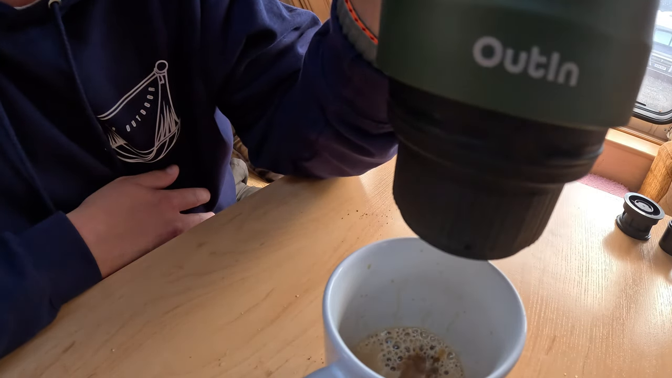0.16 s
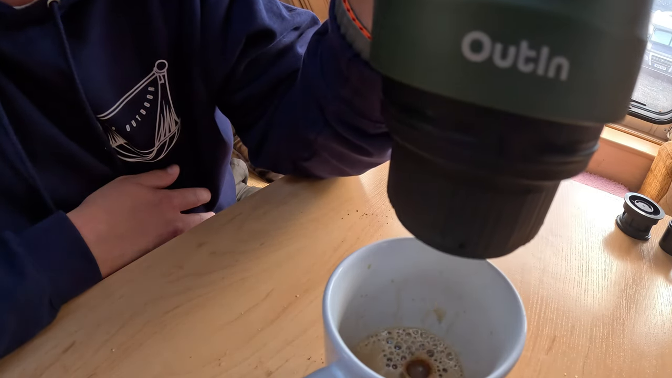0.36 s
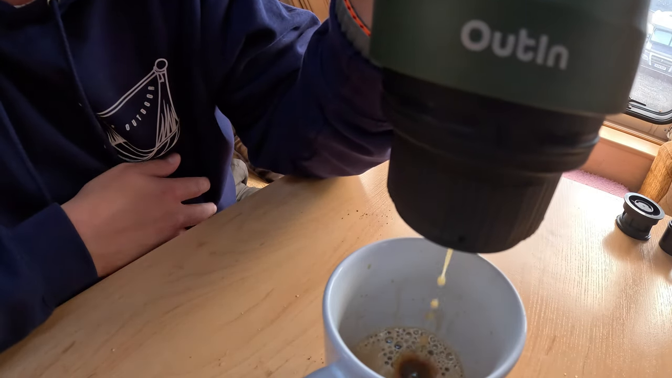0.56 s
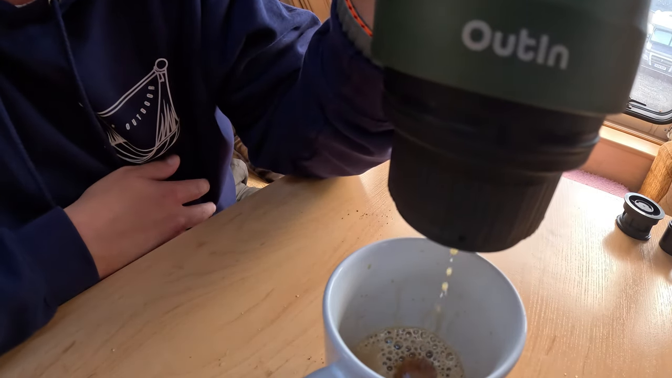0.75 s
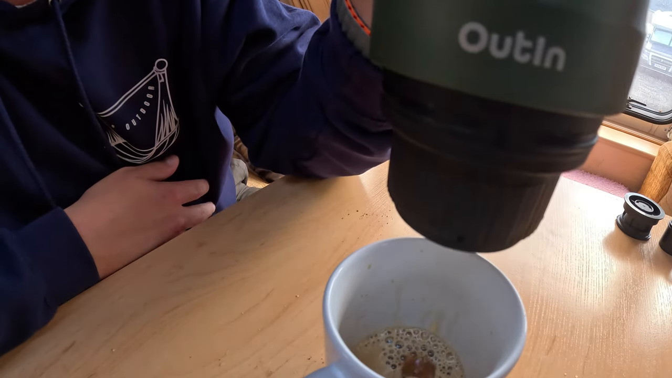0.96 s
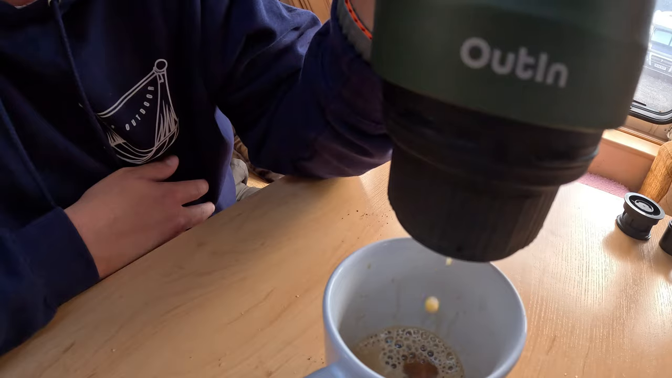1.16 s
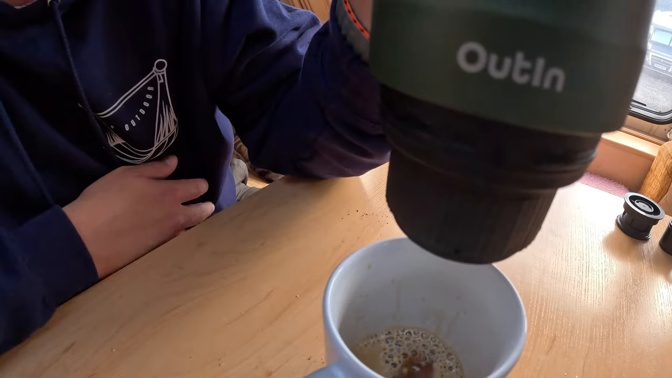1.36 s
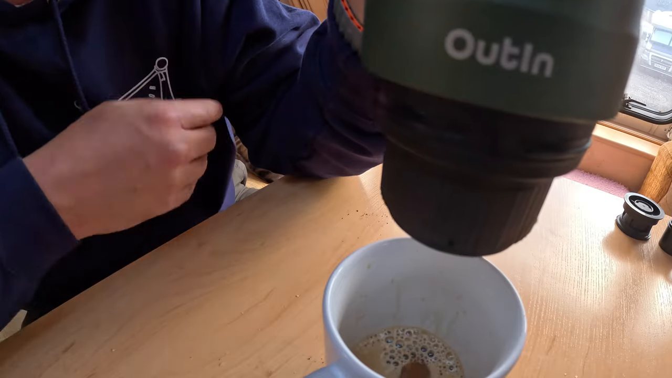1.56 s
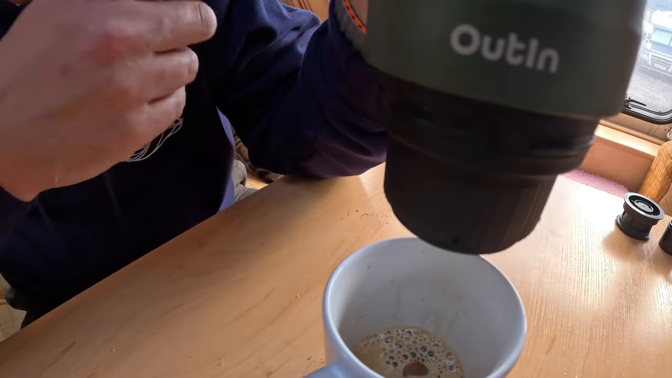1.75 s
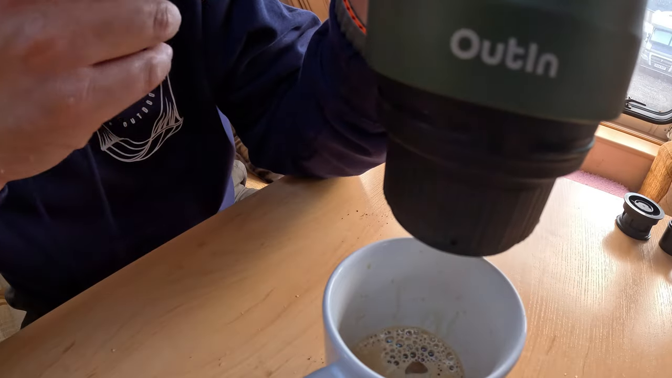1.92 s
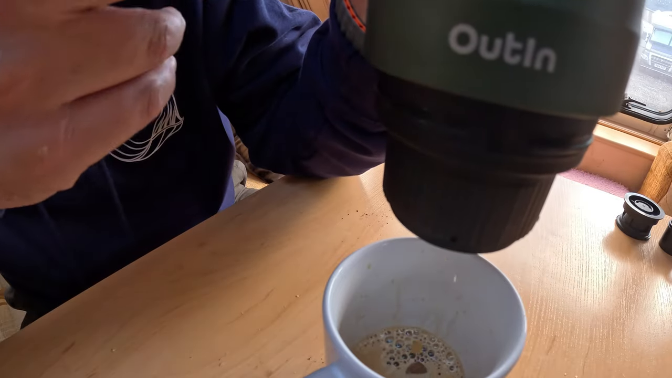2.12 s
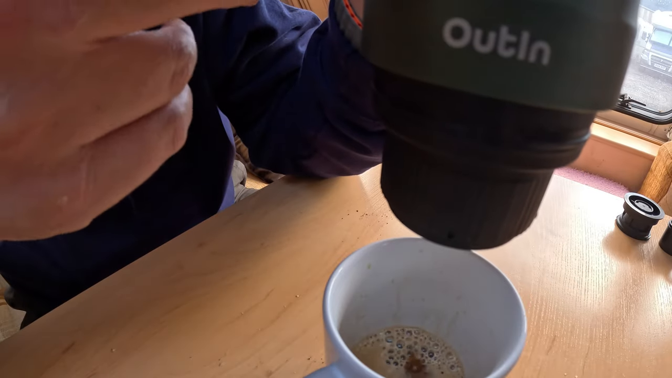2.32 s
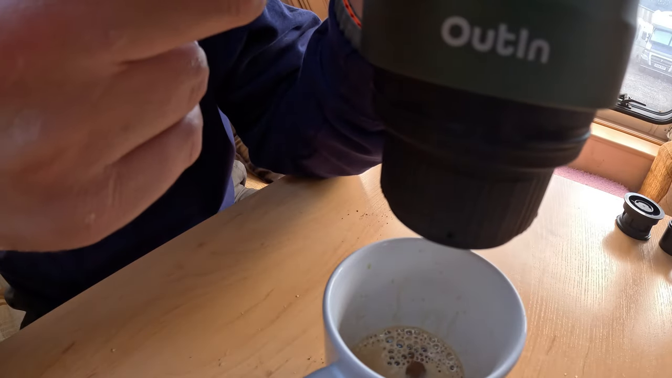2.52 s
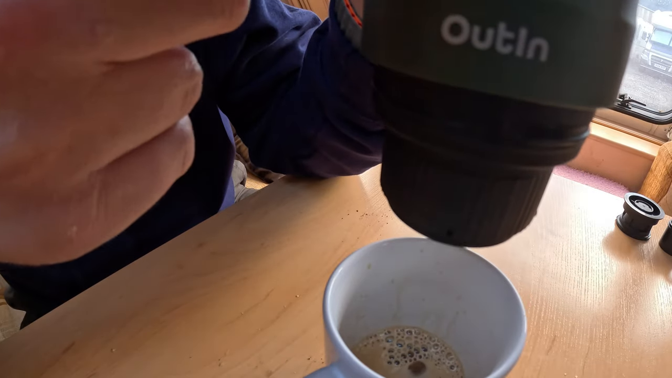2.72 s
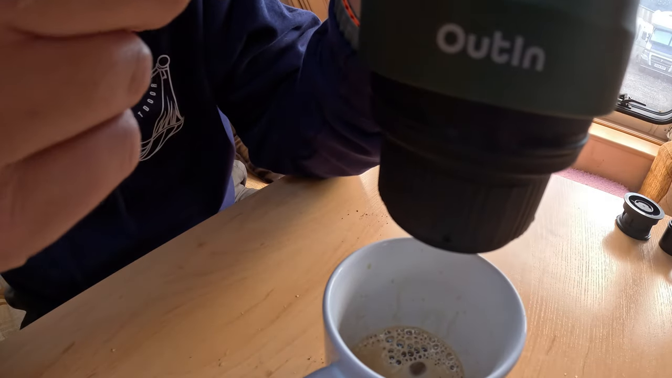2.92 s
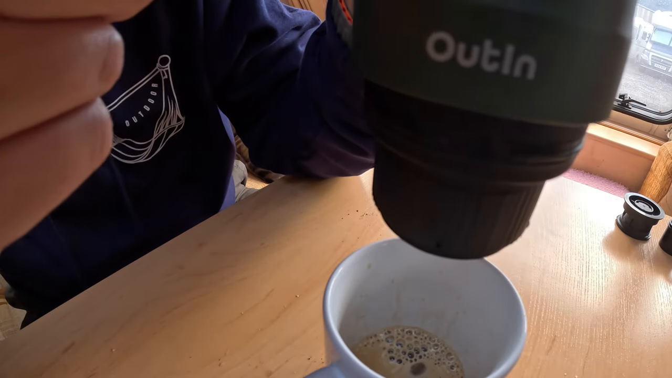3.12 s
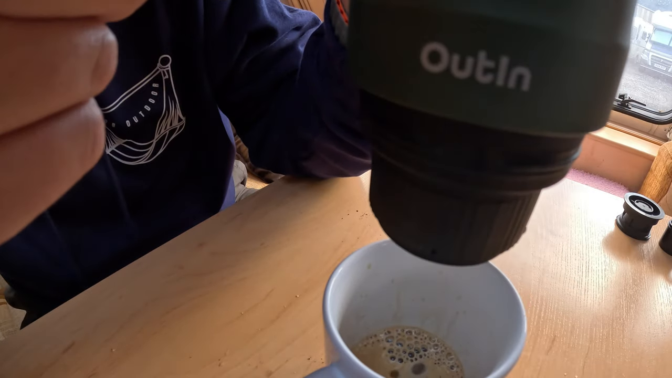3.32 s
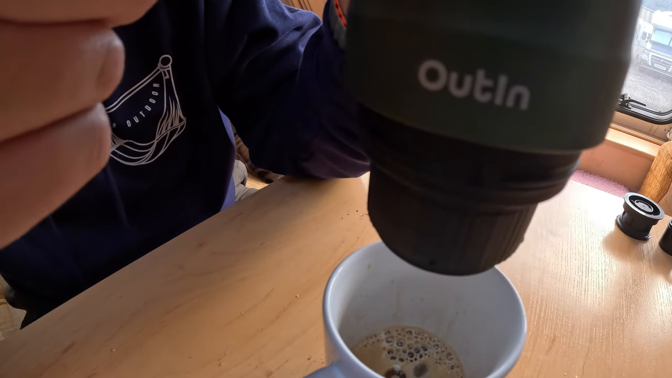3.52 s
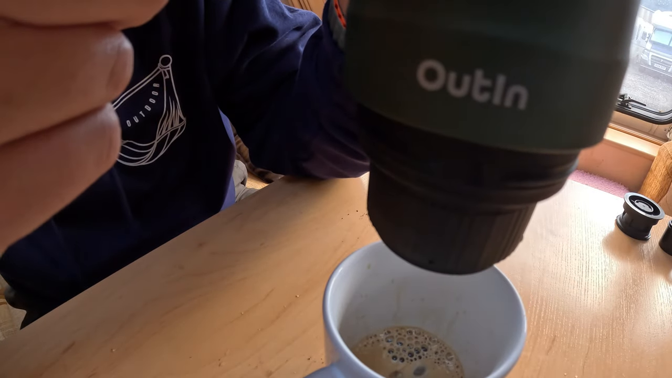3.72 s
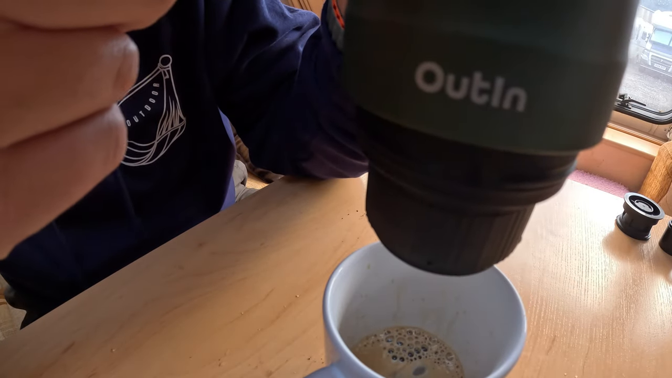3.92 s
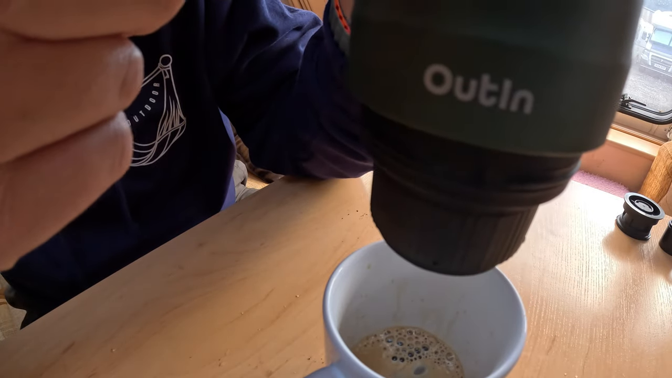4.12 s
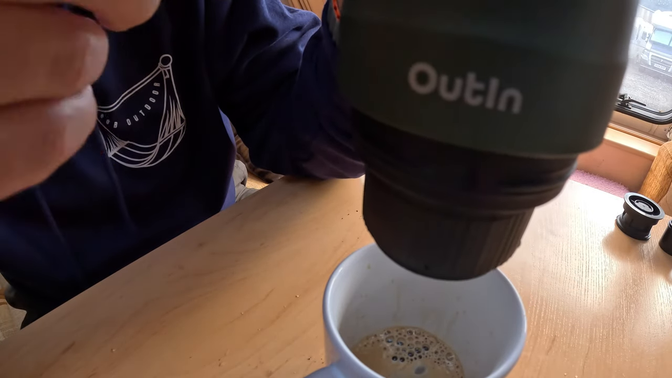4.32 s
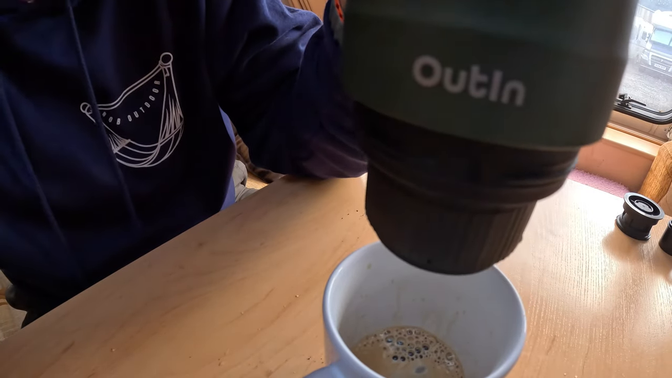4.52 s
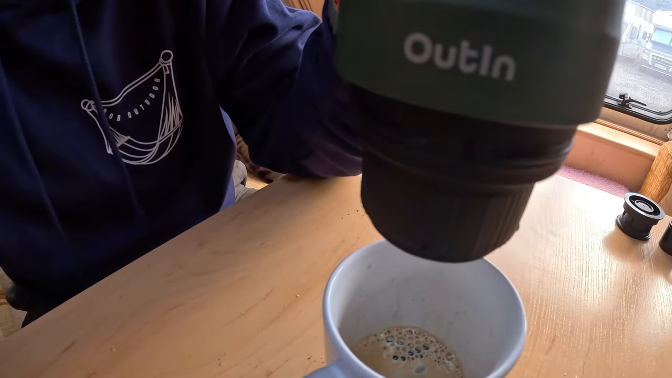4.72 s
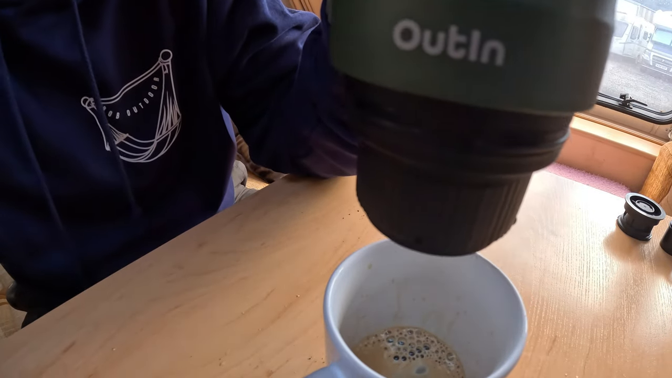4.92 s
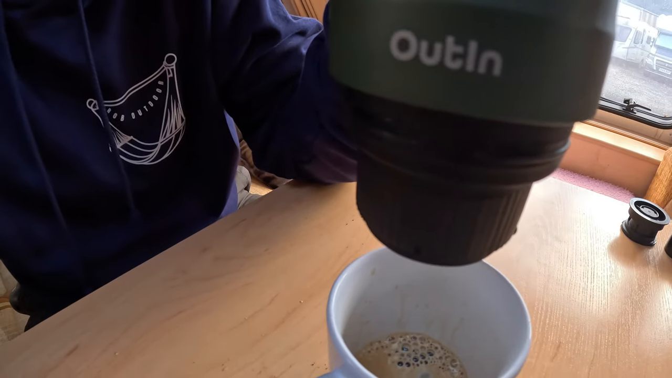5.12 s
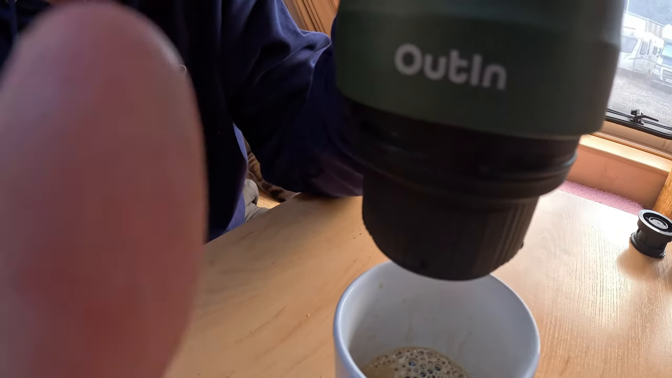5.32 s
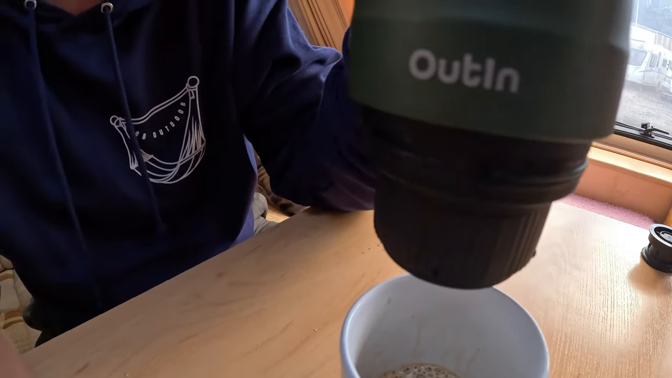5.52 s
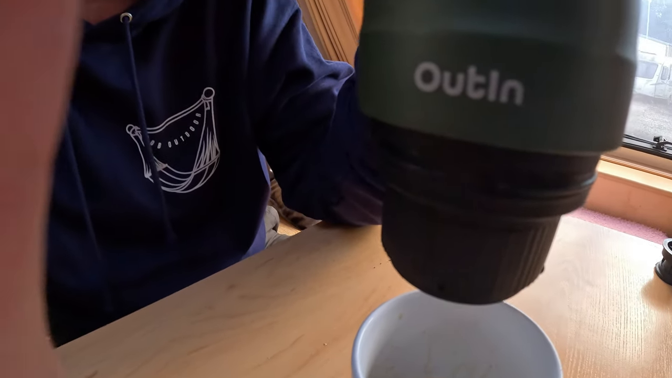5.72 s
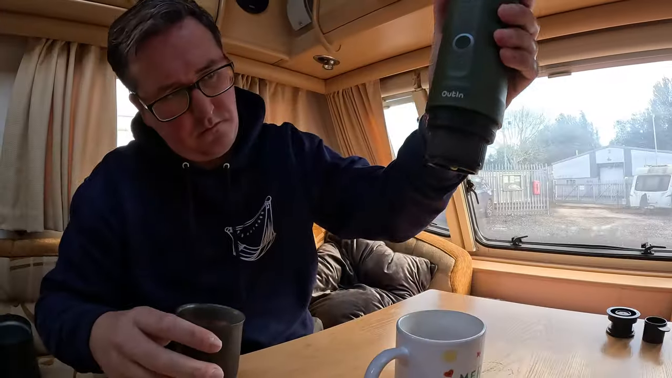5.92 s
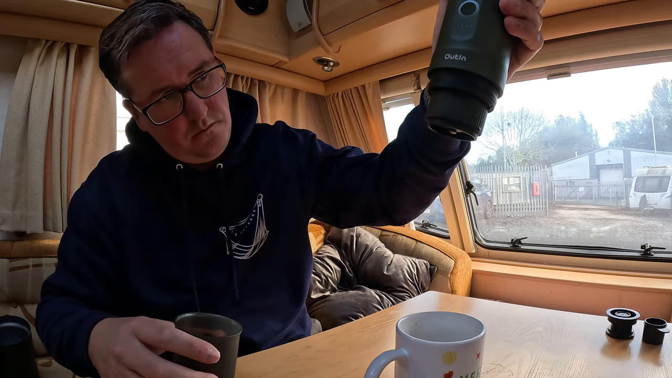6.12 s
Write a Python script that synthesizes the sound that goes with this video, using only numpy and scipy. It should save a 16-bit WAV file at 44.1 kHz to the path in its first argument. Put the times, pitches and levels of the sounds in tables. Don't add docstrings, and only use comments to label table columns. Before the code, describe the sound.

A small housed microphone close to a hand-held pump catches a steady electric buzz, fast valve clicks and hissing liquid. A brief dip and gurgle lead into a high wavering air squeal and drips in a cup. The buzz becomes steadier and airier until it suddenly winds down in a few loose clicks. The dry little cabin falls nearly silent, then fingers scuff and objects knock lightly on a table.

```python
import sys
import numpy as np
from scipy import signal
from scipy.fft import rfft, irfft
from scipy.io import wavfile
from scipy.ndimage import uniform_filter1d

SR = 44100
rng = np.random.default_rng(int(sys.argv[2]) if len(sys.argv) > 2 else 0)


def gain_from_db(level_db):
    decades = np.asarray(level_db, float) / 20
    return 10 ** decades


def to_wav(s):
    ch = np.atleast_2d(s).T
    pcm = np.round(np.clip(ch, -1, 1) * 32767)
    wavfile.write(sys.argv[1], SR, pcm.astype(np.int16))


N = 271656

# t/s, rate/(turns per s)
SPEED = [(0, 74.6), (.28, 74.3), (.39, 73.9), (.46, 71.7), (.515, 69.1), (.57, 73.2), (.6, 74.4),
         (.76, 75.2), (1.11, 75.6), (1.6, 75.6), (1.86, 75.0), (1.92, 73.8), (1.98, 75.2), (2.12, 75.4),
         (2.57, 75.4), (2.95, 75.7), (4.55, 76.0)]
# t/s, state (0 water, 1 froth, 2 air)
EMPTYING = [
    (0, -0.3),
    (.5, -1),
    (.62, 1.42),
    (1.8, 1.2),
    (2.1, 1.48),
    (3.3, 2),
    (6.2, 2),
]
# hum level/dB, valve level/dB, rattle level/dB, hiss level/dB
STATES = [(-21.5, -31, -45, -32.5), (-22.5, -34, -44, -31.5), (-21.5, -30.5, -43.5, -31.5)]
LOOSE = [.8, .8, .35]
COAST_DB_PER_S = [90, 85, 140, 35, 15]
# multiple of turn rate, level/dB
LOADED_HUM = [(1, -43), (2, -21), (3, -12), (4, -16), (5, -33), (6, -21), (7, 0), (8, -10), (9, -1),
              (10, -3), (11, -1), (12, -1), (13, -15), (14, -9), (15, -12), (16, -9), (17, -14), (18, -7),
              (19, -6), (20, -6), (21, -15), (22, -14), (23, -13), (24, -14), (25, -19), (26, -17)]
# multiple of turn rate, level/dB
FROTH_HUM = [(1, -41), (2, -25), (3, -11), (4, -15), (5, -26), (6, -24), (7, -3), (8, -4), (9, -4), (10, 0),
             (11, -3), (12, -1), (13, -15), (14, -14), (15, -8), (16, -10), (17, -5), (18, -13), (19, -11),
             (20, -15), (21, -9), (22, -13), (23, -19), (24, -16), (25, -20), (26, -18)]
# multiple of turn rate, level/dB
FREE_HUM = [(1, -47), (2, -30), (3, -15), (4, -21), (5, -28), (6, -20), (7, -6), (8, -5), (9, -11), (10, 0),
            (11, -10), (12, -5), (13, -18), (14, -23), (15, -11), (16, -13), (17, -10), (18, -12),
            (19, -19), (20, -17), (21, -17), (22, -15), (23, -15), (24, -24), (25, -23), (26, -24)]
# share of turn, level/dB
CONTACTS = [(.0, 5), (0.117, -11), (0.328, -7.5), (0.5, -7.5), (0.659, -5.5), (0.837, -9.5)]
# f/Hz, width/Hz, level/dB
SHELL = [(2350, 850, -1), (2904, 376, 3)]
SHELL_PASS_HZ = [1650, 3450]
# share of turn, level/dB
GEAR = [(.27, -16), (.37, -1), (0.498, -9.5), (.66, 1.5), (0.782, 12.5), (0.924, 20)]
# f/Hz, width/Hz, level/dB
HOUSING = [(4170, 347, 3), (4920, 1300, -15), (5390, 32, -23), (5780, 330, -4.5), (7736, 230, -8.5),
           (10670, 1700, -18.5), (10950, 510, -16.5)]
# f/Hz, density/(dB per Hz)
HISS = [(40, -47.5), (100, -35.5), (220, -34), (400, -31.5), (520, -7), (800, 5), (1050, -2.5), (1700, -6),
        (3000, -2.5), (4000, -10), (5200, -13.5), (7800, -23.5), (13300, -31.5), (14300, -50)]
DRY_DB = [-1, -3.5, -6]
# t/s, peak level/dB, ring f/Hz
LAST_TURNS = [(4.574, -10.5, 845), (4.62, -19, 850), (4.639, -17, 880), (4.658, -16.5, 840),
              (4.681, -26, 770), (4.708, -25.5, 834), (4.742, -29, 780), (4.76, -32, 730)]
# t/s, level/dB, half length/s
SLUGS = [
    (0.45, -25, 0.14),
    (1.89, -25, 0.058),
]
# f/Hz, width/Hz, level/dB
CHAMBER = [(356, 65, -4.5), (835, 240, -3), (1340, 82, 2), (1600, 210, 2.5), (2020, 120, -4),
           (2930, 560, -7.5), (3920, 470, -11)]
# t/s, pitch f/Hz, level/dB
SQUEAL = [(0.749, 3860, -34), (.766, 3635, -20), (0.79, 3570, -18.5), (0.809, 3440, -30.5),
          (0.905, 3223, -23.5), (1.042, 3146, -17.5), (1.245, 3250, -23), (1.284, 3345, -24.5),
          (1.294, 3720, -18)]
OVERTONES_DB = [-8.5, -30.5, -45.5]
# t/s, peak level/dB, ring f/Hz, cup level/dB
DROPS = [(.702, -16.5, 1700, -28), (.7791, -16, 1880, -30), (.9966, -23, 1587, -30),
         (1.8994, -22, 1630, -27), (4.0695, -21, 2300, -16), (4.2385, -17, 1900, -21),
         (4.2425, -19, 2300, -25)]
CUP_HZ = [600, 1400, 3100]
# t/s, peak level/dB
SNAPS = [(0.7, -21), (0.7411, -42), (1.8894, -25), (4.0696, -15), (4.24, -37), (5.1262, -55.5),
         (5.683, -36), (5.7594, -57), (5.8057, -62), (5.8316, -53), (5.8504, -58)]
# t/s, peak level/dB, ring f/Hz, thud level/dB
SOFT_KNOCKS = [(5.614, -21, 620, -36.5), (5.634, -39, 690, -49), (5.663, -28.5, 600, -35.5),
               (5.699, -32, 620, -43), (5.831, -28, 580, -35), (5.842, -35, 466, -41)]
# t/s, peak level/dB, ring f/Hz, thud level/dB
HARD_KNOCKS = [(5.683, -21, 1200, -40), (5.8062, -26, 1050, -36.5), (5.8215, -29, 1230, -38),
               (5.8322, -26.5, 1050, -40), (5.854, -54, 1020, -46)]
# t/s, level/dB, half length/s
SCUFFS = [(5.56, -54, .09), (5.69, -48, .03), (5.755, -52, .016), (5.83, -56, .03)]
# f/Hz, density/(dB per Hz)
RUSTLE = [(350, -21), (600, -20), (725, -21), (1070, -15.5), (1540, -18.5), (2930, -17), (8500, -41.5),
          (11000, -76), (18700, -120)]
# f/Hz, density/(dB per Hz)
CABIN = [(15, -56), (25, -21), (112, -28.5), (151, -10), (179, -11), (349, -6.5), (425, -12.5), (678, -6),
         (1220, -12), (1420, -11), (1730, -18), (5370, -36), (9000, -55.5), (11700, -86.5), (19800, -120)]

OFF_S, SLOWING_PER_S2 = 4.583, 222
STALL_S, STALL_DB = 0.25, 31
WOBBLE_TURNS, SHAKEN_DB, MUFFLED_DB = .006, 2.5, -1.5
SURGE, SURGE_HZ, SURGE_WIDTH_HZ = 1.4, 870, 50
TIGHT_HZ, TIGHT_DB_PER_HZ = 3380, .07
SOFT_T60_S, SOFT_RISE_S, HARD_T60_S, HARD_RISE_S = 0.012, 0.0047, 0.0068, 0.00076
RUMBLE_DB, RUMBLE_T60_S = -4, .15
HANDLING_END_S = 5.858
CABIN_DB, BOX_DB = -50, -55


def pump():
    since_off = (np.arange(N) / SR - OFF_S).clip(0)
    speed, = in_time(SPEED)
    speed = np.maximum(speed - SLOWING_PER_S2 * since_off, 10)
    stage = in_time(EMPTYING)[0].clip(0, 2)
    hum_db, valve_db, rattle_db, hiss_db = [np.interp(stage, [0, 1, 2], db) + coasting(fade)
                                            for db, fade in zip(np.transpose(STATES), COAST_DB_PER_S)]

    labour = swells([(s + half / 3, 0, half) for s, _, half in SLUGS], edge_db=12)
    labour = labour + since_off.clip(0, .03) / .03
    turns = np.cumsum(speed) / SR + WOBBLE_TURNS * labour * drift(25)
    loose = np.interp(stage, [0, 1, 2], LOOSE) + SHAKEN_DB * labour
    valve_db = valve_db + MUFFLED_DB * labour

    stroke = gain_from_db(2.0 * np.cos(2 * np.pi * (turns - .5)) + 0.43 * np.cos(4 * np.pi * turns + 1.6))
    hiss = gain_from_db(hiss_db) * stroke * coloured(HISS, patchy_db=1.5)
    low_hiss = signal.lfilter(*signal.butter(1, 3600, fs=SR), hiss)
    hiss += (gain_from_db(np.interp(stage, [0, 1, 2], DRY_DB)) - 1) * low_hiss

    shell = signal.butter(2, SHELL_PASS_HZ, "band", fs=SR, output="sos")
    snaps = signal.sosfilt(shell, valves(turns, loose, CONTACTS, SHELL, count=1))
    rattle = valves(turns, loose, GEAR, HOUSING, count=2)
    contacts = gain_from_db(valve_db + 1.5) * snaps + gain_from_db(rattle_db) * rattle
    for s, db, hz in LAST_TURNS:
        add_ring(contacts, s, db, hz, t60=.028, rise=0.0022)

    steady = gain_from_db(hum_db) * hum(speed, turns, stage)
    surge = SURGE * resonate(labour * steady, SURGE_HZ, SURGE_WIDTH_HZ)
    return steady + surge, contacts + hiss


def hum(speed, turns, stage):
    order, out, power, step = np.array(FREE_HUM)[:, 0], 0, 0, 64
    shares = [np.clip(1 - abs(stage[::step] - k), 0, 1) for k in range(3)]
    usual = np.interp(stage[::step], [0, 1, 2], [74.5, 75.6, 75.9])
    for k in order:
        place = k * np.sqrt(speed[::step] / usual)
        colour = sum(share * np.interp(place, order, np.array(table)[:, 1])
                     for share, table in zip(shares, (LOADED_HUM, FROTH_HUM, FREE_HUM)))
        lag = .6 * k + .37 + .65 * np.arctan((k - 12.4) / .6) / np.pi
        lag -= .16 / (1 + 4 * (k - 10) ** 2)
        lag += 0.18 * np.sin(2.4 * k) * (k > 12)
        height = np.repeat(gain_from_db(colour), step)[:N]
        power = power + height ** 2 / 2
        partial = np.cos(2 * np.pi * (k * turns - lag + .012 * drift(8)))
        out = out + height * gain_from_db(0.7 * drift(3)) * partial
    return out / np.sqrt(power)


def valves(turns, loose, contacts, resonances, count):
    clicks = np.full(N + 9, 1e-18)
    for share, db in contacts:
        at = np.interp(np.arange(int(turns[-1])) + share, turns, np.arange(N))
        chance = rng.standard_normal((500, 2))[:len(at)] * loose[at.astype(int), None]
        at = abs(at + .5 * chance[:, 0])
        whole, size = at.astype(int), gain_from_db(db + chance[:, 1])
        clicks[whole] += size * (1 - at % 1)
        clicks[whole + 1] += size * (at % 1)
    out = 0
    for hz, width_hz, db in resonances:
        ring = clicks[:N]
        for _ in range(count):
            ring = resonate(ring, hz, width_hz)
        out = out + gain_from_db(db) * ring
    return rms_one(out)


def gurgle():
    t = np.arange(N) / SR
    level = swells(SLUGS, edge_db=30)
    level = level + (t > OFF_S) * gain_from_db(-39 + coasting(COAST_DB_PER_S[-1]))
    size = gain_from_db(1.6 * rng.exponential(1, N).clip(0, 4))
    knocks = (rng.random(N) < 700 / SR) * size * rng.choice([-1, 1], N) + 1e-18
    rings = sum(gain_from_db(db) * resonate(resonate(knocks, hz, w), hz, w) for hz, w, db in CHAMBER)
    return level * rms_one(rings)


def squeal():
    first, last = SQUEAL[0], SQUEAL[-1]
    start, end = (first[0] - .01, first[1], -90), (last[0] + .012, last[1], -90)
    hz, db = in_time([start] + list(SQUEAL) + [end])
    phase = 2 * np.pi * np.cumsum(hz * (1 + .002 * drift(40))) / SR
    purer_db = TIGHT_DB_PER_HZ * (hz - TIGHT_HZ).clip(0)
    overtones = sum(gain_from_db(under - purer_db) * np.sin((k + 2) * phase) for k, under in enumerate(OVERTONES_DB))
    return np.sqrt(2) * gain_from_db(db + 0.87 * drift(50)) * (np.sin(phase) + overtones)


def small_hits():
    out, cracks = np.zeros(N), np.zeros(N)
    for s, db, hz, cup_db in DROPS:
        add_ring(out, s, db, hz, t60=.010, rise=0.0018)
        for cup_hz in CUP_HZ:
            add_ring(out, s, cup_db, cup_hz, t60=8 / cup_hz, rise=.4 / cup_hz)
    for knocks, t60, rise in (SOFT_KNOCKS, SOFT_T60_S, SOFT_RISE_S), (HARD_KNOCKS, HARD_T60_S, HARD_RISE_S):
        for s, db, hz, thud_db in knocks:
            add_ring(out, s - rise / 2, db, hz, t60, rise)
            add_ring(out, s, thud_db, 125, t60=.07, rise=0.0016)
    t = np.arange(300) / SR
    for (s, db), grit in zip(SNAPS, rng.standard_normal((len(SNAPS), 300))):
        grit[:2] = -7.0
        at = round(s * SR)
        cracks[at:at + 300] += gain_from_db(db - 3.5 - 60 * t / 0.015) * grit
    return out + signal.sosfilt(signal.butter(2, [450, 7000], "band", fs=SR, output="sos"), cracks)


def walls(x):
    out = np.zeros(N)
    for s in rng.uniform(.004, .06, 24):
        late = int(s * SR)
        out[late:] += gain_from_db(-60 * s / .14) * rng.choice([-1, 1]) * x[:N - late]
    return signal.lfilter([.4], [1, -.6], out)


def cabin():
    t = np.arange(N) / SR
    outside = gain_from_db(CABIN_DB) * coloured(CABIN, patchy_db=1.0)
    box = gain_from_db(3.96 * drift(5.5)) * rms_one(resonate(rng.standard_normal(N), 224.5, 33))
    rub = swells(SCUFFS, edge_db=6) * coloured(RUSTLE, patchy_db=0.5)
    shaken = sum((t > s) * gain_from_db(db + RUMBLE_DB - 60 * abs(t - s) / RUMBLE_T60_S)
                 for s, _, _, db in list(SOFT_KNOCKS) + list(HARD_KNOCKS))
    rumble = rms_one(resonate(resonate(rng.standard_normal(N), 130, 310), 110, 310))
    handling = (t < HANDLING_END_S) * (rub + uniform_filter1d(shaken, size=150) * rumble)
    return outside + gain_from_db(BOX_DB - 1.5) * box + handling


def coasting(db_per_s):
    since = np.clip(np.arange(N) / SR - OFF_S, 0, 2 * STALL_S)
    return -db_per_s * since - STALL_DB * (since / STALL_S) ** 4


def swells(rows, edge_db):
    t = np.arange(N) / SR
    return sum(gain_from_db(db - edge_db * ((t - s) / half).clip(-3, 3) ** 2) for s, db, half in rows)


def add_ring(out, s, db, hz, t60, rise):
    t, at = np.arange(int(.2 * SR)) / SR, round(s * SR)
    ring = (1 - np.exp(-t / rise)) ** 2 * gain_from_db(-60 * t / max(t60, .002)) * np.sin(2 * np.pi * hz * t)
    out[at:at + len(t)] += gain_from_db(db) * (ring / np.abs(ring).max())[:N - at]


def resonate(x, hz, width_hz):
    r = np.exp(-np.pi * width_hz / SR)
    poles = [1, -2 * r * np.cos(2 * np.pi * hz / SR), r * r]
    return signal.lfilter([(1 - r * r) / 2, 0, (r * r - 1) / 2], poles, x)


def coloured(points, patchy_db):
    hz = np.arange(N // 2 + 1) * SR / N + 1
    point_hz, point_db = np.transpose(points)
    shape = rfft(rng.standard_normal(N)) * gain_from_db(np.interp(np.log(hz), np.log(point_hz), point_db))
    octave = np.floor(np.log2(hz / 60).clip(0))
    return rms_one(sum(gain_from_db(patchy_db * drift(9.3)) * irfft(shape * (octave == k), N) for k in range(9)))


def drift(rate):
    r = np.exp(-80 * np.pi * rate / SR)
    slow = signal.lfilter([1], [1, -2 * r, r * r], rng.standard_normal(N // 40 + 2002))[2000:]
    return np.interp(np.arange(N) / 40, np.arange(len(slow)), rms_one(slow))


def rms_one(x):
    return x / np.sqrt(np.mean(x ** 2) + 1e-20)


def in_time(rows):
    s, *columns = np.transpose(rows)
    return [np.interp(np.arange(N) / SR, s, c) for c in columns]


def scene():
    steady, bright = pump()
    near = bright + gurgle() + squeal() + small_hits()
    return (steady + near + gain_from_db(-12) * walls(near) + cabin())[None]


def low_pass(x):
    return signal.sosfilt(signal.butter(12, 14340, fs=SR, output="sos"), x)


def record(dry):
    x = dry - resonate(dry, 9050, 1200)
    x = x - resonate(x, 9050, 500)
    x = signal.sosfilt(signal.cheby2(10, 60, 14900, fs=SR, output="sos"), x)
    return low_pass(x)


dry = scene()
out = record(dry)
to_wav(out)
```